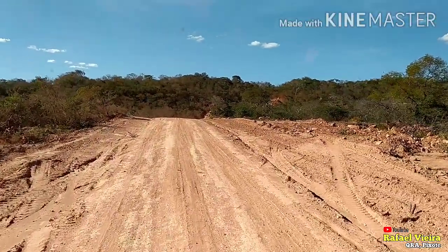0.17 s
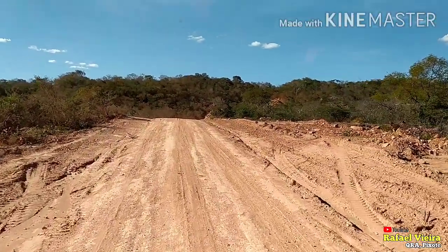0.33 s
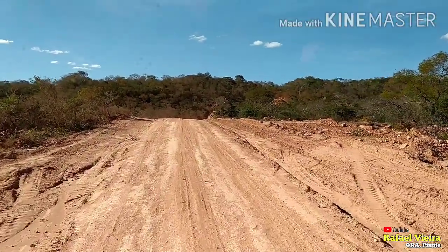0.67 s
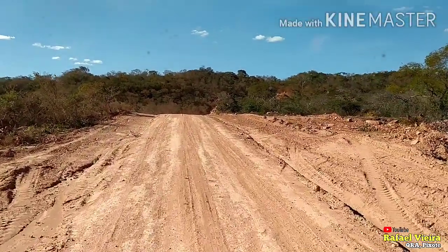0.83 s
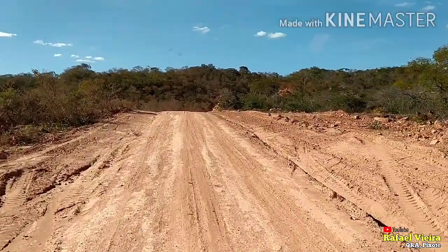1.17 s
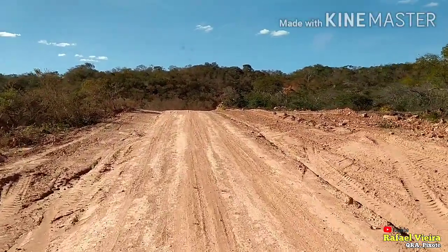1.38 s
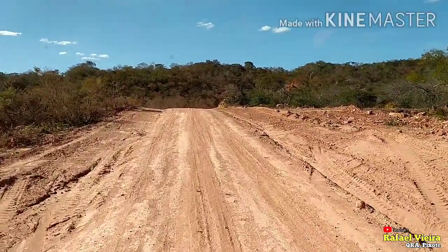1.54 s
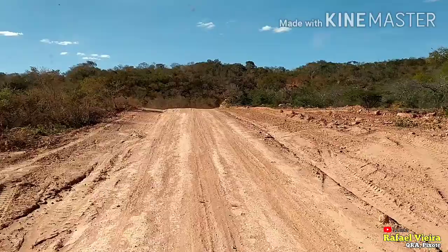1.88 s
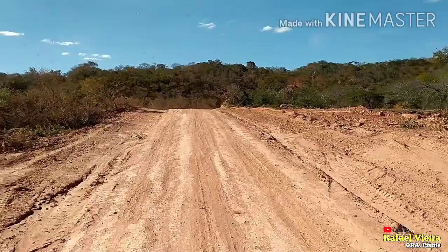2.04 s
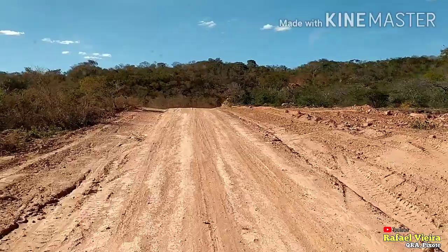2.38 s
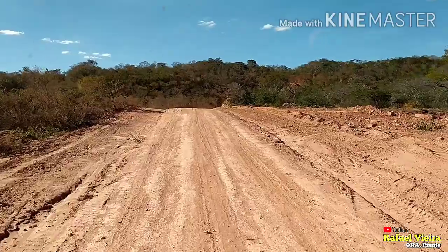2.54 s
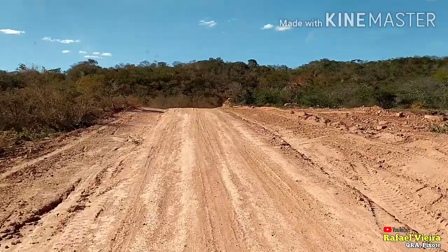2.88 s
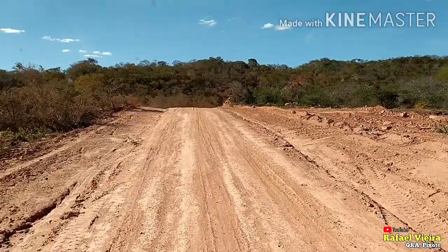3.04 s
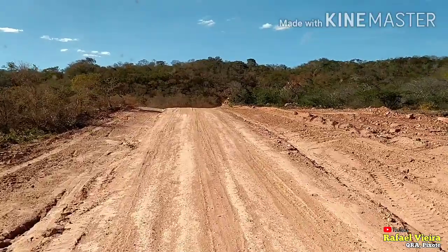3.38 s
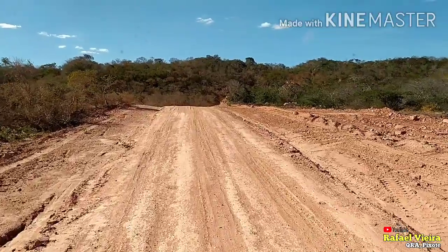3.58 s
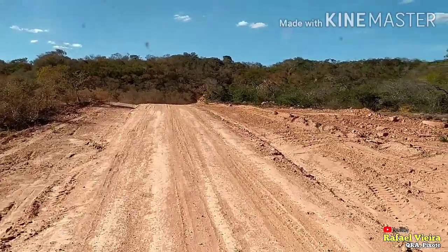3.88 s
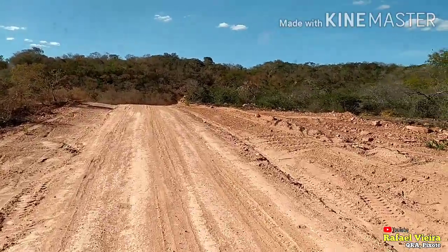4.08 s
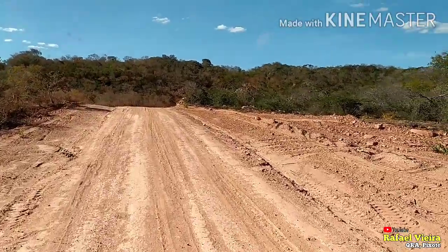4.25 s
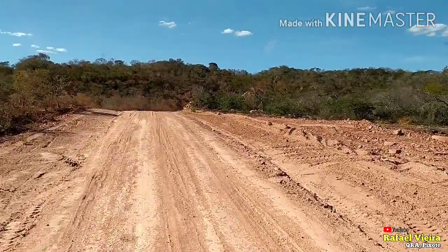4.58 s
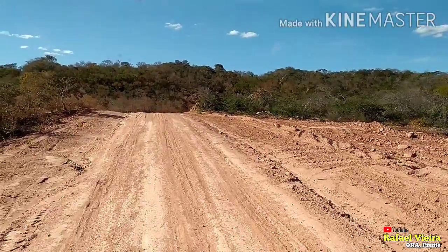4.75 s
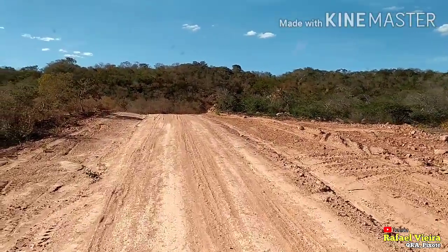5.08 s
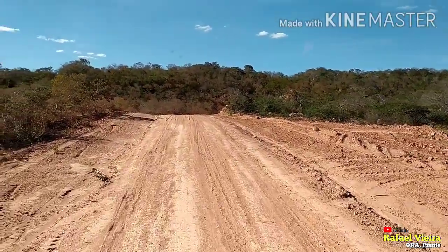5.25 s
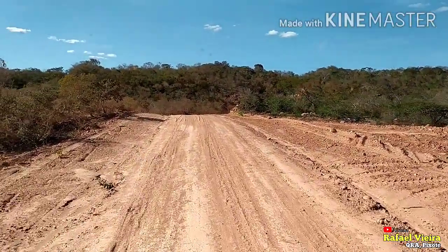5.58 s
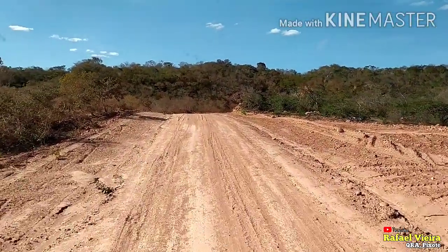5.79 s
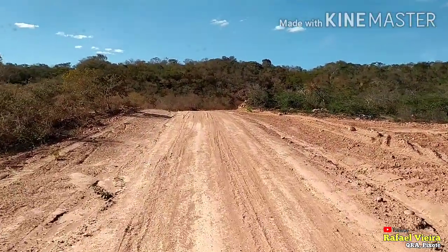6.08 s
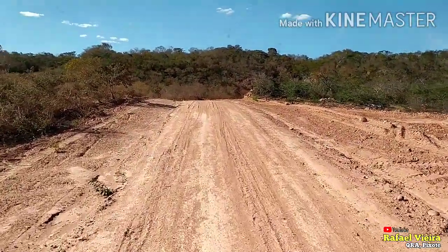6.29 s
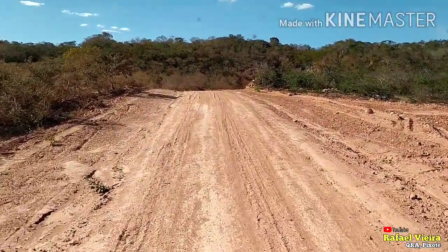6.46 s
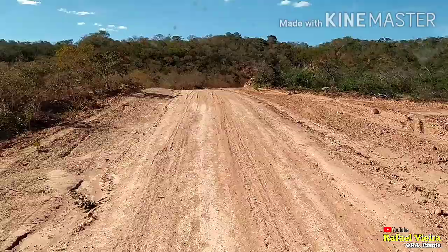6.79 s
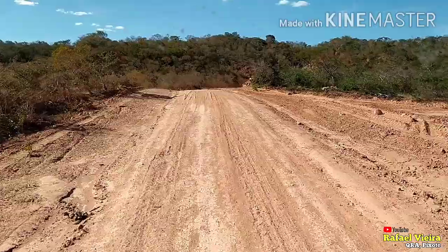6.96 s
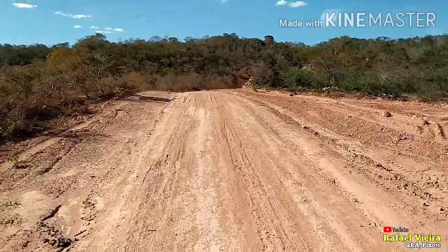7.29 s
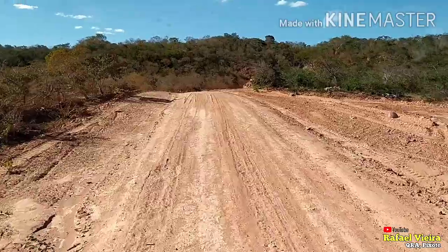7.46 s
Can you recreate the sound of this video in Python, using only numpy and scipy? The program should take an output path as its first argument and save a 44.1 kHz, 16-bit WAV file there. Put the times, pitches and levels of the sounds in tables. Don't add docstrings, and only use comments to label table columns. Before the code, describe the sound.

Inside a heavy vehicle's cab, a six-cylinder diesel pulls slowly and steadily, its low drone wavering around 58 Hz, with deep road rumble, body heaving over ruts and a faint steady pump whine near 490 Hz. From 0.25 s, close plastic trim rattles irregularly; dull knocks come at 0.6-0.8 s with a faint squeak, and the sharpest crack is at 1.65 s, another at 2.75 s. A tiny high tick repeats each second from 0.4 s. A slight air puff passes at 4.6 s. A cluster of knocks at 5.6-5.75 s leads into bright brake-air hiss, spitting at 6.2-6.4 s. Light chirps near 2.1 kHz begin at 6.03 s; from 6.64 s they become a loud, raspy, stuttering squeal on two pitches, roughest around 7.1-7.3 s, then cleaner and sinking slightly until the cut at about 7.6 s. Close stereo pickup, short dry reflections.

```python
import sys
import numpy as np
from scipy import signal
from scipy.fft import rfft, irfft, next_fast_len
from scipy.io import wavfile
from scipy.ndimage import uniform_filter1d

SR = 44100
rng = np.random.default_rng(int(sys.argv[2]) if len(sys.argv) > 2 else 0)


def output_pcm(signal):
    pcm = np.clip(np.atleast_2d(signal).T, -1, 1) * 32767
    wavfile.write(sys.argv[1], SR, np.round(pcm).astype(np.int16))


def makeup_ratio(level_db):
    decades = np.asarray(level_db, float) / 20
    return 10 ** decades


N = 336483

# time in seconds, half the firing rate in Hz, firing tone level in dB.
DRIVE = [(0.0, 30.3, -35), (0.19, 29.03, -34), (0.53, 29.98, -31), (0.7, 28.88, -35.5),
         (1.46, 27.82, -33.5), (3.53, 28.11, -30.5), (3.65, 28.95, -34), (3.87, 28.33, -31.5),
         (4.57, 28.99, -31.5), (5.06, 29.84, -35), (5.97, 29.33, -34.5), (6.06, 29.4, -39),
         (6.38, 30.0, -49), (6.78, 28.96, -51), (6.99, 29.1, -34), (7.63, 28.82, -45)]


def evened(x):
    return x / np.sqrt(np.mean(abs(x) ** 2) + 1e-20)


def read(points, hz):
    f, value = np.transpose(points)
    return np.interp(np.log(hz + 1), np.log(f + 1), value)


def curves(rows):
    s, *columns = np.transpose(rows)
    return [np.interp(np.arange(N) / SR, s, c) for c in columns]


def wander(width_hz, count=N):
    step = max(1, int(SR / width_hz) // 32)
    r = np.exp(-np.pi * width_hz * step / SR)
    few = min(count // step + 2, count // 4)
    kicks = rng.standard_normal((few, 2)) @ [1, 1j]
    z = signal.lfilter([1], np.convolve([1, -r], [1, -r]), kicks)
    return np.interp(np.arange(count) / step, np.arange(len(z)), evened(z))


def drift(turns, width_hz, count):
    return np.exp(2j * np.pi * turns * wander(width_hz, count).real)


def spin(hz, count=N):
    return np.exp(2j * np.pi * np.cumsum(hz * np.ones(count)) / SR)


def band(x, edges_hz):
    return signal.sosfilt(signal.butter(2, edges_hz, "bandpass", fs=SR, output="sos"), x)


def coloured(x, points):
    size = next_fast_len(x.shape[-1])
    gain = makeup_ratio(read(points, np.fft.rfftfreq(size, 1 / SR)))
    return irfft(rfft(x, size) * gain, size)[..., :x.shape[-1]]


def bumps(at_s, width_s):
    t = np.arange(0, N, 64) / SR
    return np.exp(-((t - np.reshape(at_s, (-1, 1))) / width_s) ** 2)


def fine(coarse):
    return np.interp(np.arange(N) / 64, np.arange(len(coarse)), coarse)


def noise(colour, level_db, patchy_db):
    # frequency in Hz, left-right correlation from -1 to 1.
    likeness = [(60, 0.62), (130, 0.99), (290, 0.71), (640, 0.82), (1410, -0.41), (3100, 0.031),
                (6820, 0.072), (15000, -0.04)]
    frames, hz = N // 512 + 5, np.fft.rfftfreq(2048, 1 / SR)[:, None]
    a, b, c, d, patches = rng.standard_normal((frames, 1025, 5)).T
    patches = evened(uniform_filter1d(uniform_filter1d(patches, size=16, axis=0), size=6, axis=1))
    same = np.clip(read(likeness, hz), -1, 1)
    left = a + 1j * b
    right = same * left + np.sqrt(1 - same ** 2) * (c + 1j * d)
    z = np.array([left, right])
    shape = makeup_ratio(read(colour, hz))
    at = np.minimum(np.arange(frames) * 512, N - 1)
    z *= shape / np.linalg.norm(shape) * makeup_ratio(level_db(hz, at) + patchy_db * patches)
    return signal.istft(z, nperseg=2048, noverlap=1536)[1][:, :N]


def cab():
    # frequency in Hz, density in dB per Hz.
    colour = [(18, -38), (30, -41.5), (59, -6.5), (82, -8.5), (103, -14.5), (161, -6), (345, -14),
              (740, -20), (2290, -31), (3310, -39.5), (6900, -44.5), (11800, -46), (12600, -53),
              (15800, -73)]
    hz, _ = curves(DRIVE)
    roar = noise(colour, lambda f, at: -37.5 + 0 * f, patchy_db=1.38)
    return roar * (1 + .12 * spin(hz).real)


def engine():
    orders_db = [-41, -79, -43, -96, -72, -62, -41, -46, -56, -38, -47.5, -44.5, -40, -47, -45.5, -41,
                 -45.5, -51.5]
    # time in seconds, heave level in dB.
    ruts = [(0.1, -49), (0.95, -40), (1.38, -33), (2.0, -36), (2.7, -47), (3.23, -27.5), (3.89, -30.5),
            (4.46, -37), (5.01, -32), (5.33, -42), (6.1, -34), (6.48, -28.5), (6.76, -32), (7.48, -23.5)]
    hz, firing_db = curves(DRIVE)
    cycle = spin(hz / 3)
    out = makeup_ratio(firing_db) * cycle ** 6 * (1 + .15 * wander(4.0))

    order = cycle ** 2 * makeup_ratio(0.1 * (firing_db - firing_db.mean()))
    for db in orders_db:
        order = order * cycle
        steady = .8 * np.exp(2j * np.pi * rng.random())
        out += makeup_ratio(db) * order * (steady + .5 * wander(10.))

    rut_s, rut_db = np.transpose(ruts)
    heave = makeup_ratio(-43.5) + fine(makeup_ratio(rut_db) @ bumps(rut_s, 0.098))
    out += heave * spin(16) * wander(11)

    whine_hz = 487.4 + 0.49 * np.arange(N) / SR
    out += makeup_ratio(-42.5) * spin(whine_hz) * (.93 + .25 * wander(14.0))
    fan_db = -59 - 11 * fine(bumps(4.3, .5)[0])
    out += makeup_ratio(fan_db) * spin(1424) * (1.07 + 0.52 * wander(6.1))
    out += makeup_ratio(-61.) * spin(2260.) * wander(90.)
    return np.sqrt(2) * out.real


def leak():
    # frequency in Hz, density in dB per Hz.
    colour = [(2500, -11), (5000, -17), (7500, -16), (9000, -8), (11000, -6.5), (12100, -22), (12600, -19),
              (15800, -29)]
    # time in seconds, level in dB.
    spits = [
        (5.743, -26),
        (6.1843, -21.5),
        (6.239, -22),
        (6.2522, -23),
        (6.3864, -21),
    ]
    since = np.arange(N) / SR - 5.74
    opened = np.clip(since / 0.058, 0, 1) * makeup_ratio(-37 - 0.5 * since)
    puff = makeup_ratio(-54.5) * fine(bumps(4.64, 0.37)[0])
    flow = makeup_ratio(-55.5) + puff + opened
    t, spit_t60_s = np.arange(3000) / SR, 0.033
    for s, db in spits:
        spit = makeup_ratio(db - 1.5 - 60 * t / spit_t60_s) * np.minimum(t / 0.0011, 1)
        flow[round(s * SR):][:3000] += spit
    return flow * makeup_ratio(-3.0) * noise(colour, lambda f, at: 0 * f, patchy_db=2.0)


def ticks():
    levels_db = [-48, -44.5, -47, -49, -50, -54]
    first_s, every_s = .3885, .9997
    out, t = np.zeros(N), np.arange(1400) / SR
    ring = evened(band(rng.standard_normal(N), (10000, 11300)))
    fade = makeup_ratio(-300 * t) * signal.windows.tukey(1400, .3)
    for k, db in enumerate(levels_db):
        at = round((first_s + k * every_s) * SR)
        out[at:at + 1400] = makeup_ratio(db) * fade * ring[at:at + 1400]
    return out


def creak():
    turn = spin(1036) * drift(.1, 30., N)
    swell = fine(bumps(.645, 0.02)[0])
    return makeup_ratio(-40.5) * swell * (turn + makeup_ratio(-10.5) * turn ** 2).real


def rattles():
    # time in seconds, crack in dB, plastic body in dB, knock in dB, body ring in Hz.
    jolts = [(0.254, -40.5, -43.5, -44, 1680), (0.5735, -45, -46, -30.5, 1310),
             (0.659, -57, -57, -32, 1270), (0.778, -59, -64, -25, 1112), (1.1781, -40, -48, -45, 1459),
             (1.6491, -28, -52, -25.5, 1377), (1.655, -22, -22.5, -42, 1255),
             (1.7361, -36.5, -51, -52, 1400), (1.7691, -28, -39, -40, 1720), (2.242, -36.5, -54, -45, 1510),
             (2.754, -26.5, -39.5, -46, 3020), (3.265, -38, -45, -48, 1190), (4.4098, -37, -43, -36, 1650),
             (4.779, -30.5, -51, -53, 1280), (5.0869, -38.5, -64, -51, 1570), (5.3135, -34, -42, -52, 1780),
             (5.5765, -40, -47, -48, 2266), (5.672, -35.5, -33, -23, 2690), (5.703, -42, -40, -31, 990),
             (5.7439, -33, -29, -49, 1420), (5.988, -62, -29.5, -43, 1777), (6.184, -42, -50, -40, 2100),
             (6.2392, -36, -52, -48, 2150), (6.386, -38, -43, -46, 2180)]
    t60_s = 0.031
    out, t = np.zeros((2, N + 6000)), np.arange(6000) / SR
    for s, crack_db, body_db, knock_db, ring_hz in jolts:
        shared, own = rng.standard_normal((4, 1, 6000)), rng.standard_normal((4, 2, 6000))
        grit = rng.exponential(1, 6000)
        clusters = (0.51 * shared + 0.96 * own) * grit
        parts = [
            ((3000, 14500), crack_db - 0.5, 1),
            ((1000, 3800), body_db + 1.0, 1.3),
            ((1.0 * ring_hz, 1.05 * ring_hz), body_db + 3.5, 1.5),
            ((300, 1050), knock_db + 3.5, 3.2)]
        for contacts, (edges_hz, db, slow) in zip(clusters, parts):
            rise = 1 - np.exp(-t / (0.0007 * slow ** 2))
            fall = makeup_ratio(db - 60 * t / (t60_s * slow))
            lower_edges_hz = (0.51 * edges_hz[0], 0.82 * edges_hz[1])
            hit = evened(band(band(contacts, edges_hz), lower_edges_hz))
            out[:, round(s * SR):][:, :6000] += fall * rise * hit
    return out[:, :N]


def holds(t, start, length, t60, grab_s):
    since = t - start[:, None]
    release = np.maximum(since - length[:, None], 0)
    return np.clip(since / grab_s, 0, 1) * makeup_ratio(-60 * release / t60)


def summed(levels_db, shapes):
    return 10 * np.log10(makeup_ratio(levels_db) ** 2 @ shapes ** 2 + makeup_ratio(-55) ** 2)


def seat(n):
    # start in seconds, length in seconds, level in dB, pitch in Hz.
    touches = [(6.033, .022, -35.5, 2180), (6.055, 0.031, -27, 2160), (6.083, 0.023, -24, 2144),
               (6.112, 0.015, -28.5, 2221), (6.166, 0.028, -32.5, 2245), (6.19, 0.031, -22, 2103),
               (6.244, 0.01, -28.5, 2060), (6.267, 0.019, -36.5, 2142), (6.361, 0.032, -39.5, 2170),
               (6.399, .04, -33, 2118), (6.537, 0.019, -42, 2108), (6.573, .025, -32, 2077),
               (6.609, 0.019, -32.5, 2154)]
    # start in seconds, length in seconds, upper mode in dB, lower mode in dB,
    # overtones in dB.
    slips = [(6.638, 0.03, -25.5, -44, -32.5), (6.662, 0.046, -27, -37, -21.5),
             (6.727, 0.032, -25, -29, -24), (6.794, 0.033, -30, -36, -36), (6.818, .064, -24, -29, -20),
             (6.914, .01, -28, -24, -34), (6.94, 0.058, -25, -23.5, -18.5), (6.996, .055, -23.5, -21, -19),
             (7.075, 0.08, -25, -20.5, -19.5), (7.164, 0.055, -30, -21, -21),
             (7.212, 0.06, -26.5, -21, -21), (7.274, 0.097, -27.5, -22, -19), (7.338, 0.024, -23, -20, -25),
             (7.364, 0.042, -23.5, -16.5, -19.5), (7.406, 0.0494, -20.5, -32, -22.5),
             (7.476, 0.0612, -22.5, -40.5, -25), (7.544, 0.042, -21, -32.5, -19.5),
             (7.588, 0.034, -21, -33, -17)]
    # time in seconds, upper mode in Hz, jitter from 0 to 1.
    under_load = [
        (6.6, 2046, 0.68),
        (6.8, 1992, 0.64),
        (6.86, 1935, .6),
        (7.1, 1929, 0.76),
        (7.3, 1881, 0.72),
        (7.4, 1964, 0.42),
        (7.5, 1996, 0.25),
        (7.57, 1875, 0.41),
        (7.63, 1820, 0.07),
    ]
    touch_s, grab_s, slack_hz, chirp_jitter = .012, .008, 69.8, .17
    t = np.arange(N - n, N) / SR

    start, length, chirp_db, chirp_hz = np.transpose(touches)
    chirps = makeup_ratio(chirp_db)[:, None] * holds(t, start, length, .06, touch_s)
    beat = np.cos(2 * np.pi * 62 * (t - start[:, None] - touch_s))
    chirps = chirps * (1 + .16 * beat)

    start, length, upper_db, lower_db, overtones_db = np.transpose(slips)
    modes = holds(t, start, length, .09, grab_s)
    contact = holds(t, start, length, 0.061, grab_s)
    loaded_hz, loaded_jitter = (c[-n:] for c in curves(under_load))
    slack = 1 - uniform_filter1d(contact.max(0), size=600)
    loaded_hz = loaded_hz + slack_hz * loaded_jitter * slack

    light = (chirps ** 2).sum(0) + 1e-12
    heavy = makeup_ratio(upper_db) ** 2 @ modes ** 2
    light_hz = (chirp_hz @ chirps ** 2 + 1e-12 * chirp_hz[0]) / light
    load = heavy / (light + heavy)
    return (10 * np.log10(light + heavy),
            light_hz + load * (loaded_hz - light_hz),
            summed(lower_db, contact) - 13 * (1 - load),
            summed(overtones_db, contact),
            chirp_jitter + load * (loaded_jitter - chirp_jitter))


def squeal():
    # frequency in Hz, width in Hz, level in dB.
    lower_modes = [(1656, 33, -1), (1714, 46, -9.5), (1475, 210, -15)]
    # multiple of the joint phase, level in dB.
    overtones = [(2, -10.5), (3, -10.5), (4, -4.5), (5, -3.5), (6, -3), (7, -10), (8, -15)]
    # frequency in Hz, gain in dB.
    valve_body = [(1200, -8), (2300, -1.5), (2800, -6.5), (3300, -2), (4250, 0), (4600, -3), (5000, -1.5),
                  (6200, -7), (6800, -6.5), (9300, 0), (12100, -9.5), (12500, -13), (13500, 2), (15500, -7)]
    n = N - round(6 * SR)
    upper_db, hz, lower_db, overtones_db, jitter = seat(n)
    jitter = np.clip(jitter, 0, 1)

    turn = spin(hz * (1 + 0.024 * jitter * wander(300., n).real), n)
    lower = np.zeros(n, complex)
    for f, width, db in lower_modes:
        sway = 0.45 * drift(0.19, width, n) + 0.65 * wander(2.6 * width, n)
        lower += makeup_ratio(db) * spin(f, n) * sway
    lower = evened(lower)
    phase = makeup_ratio(upper_db) * turn + 0.76 * makeup_ratio(lower_db) * lower
    phase /= abs(phase)

    unsteady = jitter * (0.8 * wander(85.0, n) + 0.6 * jitter * wander(320.0, n))
    upper = turn * (np.sqrt(1 - 0.6 * jitter ** 2) + unsteady)
    octave_db = np.minimum(0.6 * (upper_db + 21) - (hz - 2100) / 15., 0) - 12.
    upper += makeup_ratio(octave_db) * turn ** 2 * (0.9 + 0.25 * wander(60., n))

    out = np.zeros((2, N))
    for port in out:
        modes = makeup_ratio(upper_db) * upper * drift(0.047 + 0.079 * jitter, 23.0, n)
        modes += makeup_ratio(lower_db) * lower * drift(0.18, 16.0, n)
        contact = np.zeros(n)
        for k, db in overtones:
            waver = 0.7 - 0.28 * jitter + (0.55 + 0.29 * jitter) * wander(170.0, n)
            contact += makeup_ratio(db) * (phase ** k * waver).real
        rasp = 0.79 * jitter ** 2 * rng.standard_normal(n)
        buzz = makeup_ratio(overtones_db) * coloured(contact + rasp, valve_body)
        port[-n:] = np.sqrt(2) * (modes.real + buzz)
    return out


def cabin(x, lag, wet_db, t60):
    # frequency in Hz, gain in dB.
    top_loss = [(11800, 3), (12600, -17), (15000, -8.5)]
    t = np.arange(3000) / SR
    taps = rng.choice([-1., 1.], (2, 3000)) * (rng.random((2, 3000)) < .06)
    taps *= makeup_ratio(-60 * t / t60) * (t > .0008)
    taps *= makeup_ratio(wet_db) / np.linalg.norm(taps, axis=1, keepdims=True)
    taps[0, lag] += 1
    taps[1, 0] += 1
    return coloured(signal.fftconvolve(np.atleast_2d(x), taps, axes=1)[:, :N], top_loss)


def scene():
    far = engine() + makeup_ratio(4.0) * (cab() + leak())
    near = cabin(rattles() + ticks() + creak(), 20, wet_db=-6.5, t60=0.1)
    valve = makeup_ratio([[-.6], [-.7]]) * cabin(squeal(), 14, wet_db=-8.0, t60=0.05)
    return far + near + valve


def band_limit(x):
    return signal.sosfilt(signal.butter(12, 16260, fs=SR, output="sos"), x)


def record(dry):
    # frequency in Hz, left over right in dB.
    tilt = [(60, 0), (150, -1.5), (380, 0), (950, 1), (2380, 7.5), (5980, -0.5), (15000, 8)]
    # frequency in Hz, margin to the neighbouring bands in dB under which a
    gate = [(2900, -30), (3200, -3), (4500, -1.4), (8000, -1.4), (8500, -7), (12200, -7), (12500, 1.2)]
    left = coloured(dry[0], [(f, db / 2) for f, db in tilt])
    right = coloured(dry[1], [(f, -db / 2) for f, db in tilt])
    hz, _, z = signal.stft([left, right], SR, nperseg=1024, noverlap=512)
    power = uniform_filter1d((abs(z) ** 2).sum(0), size=3, axis=1)
    narrow_db = 10 * np.log10(uniform_filter1d(power, size=4, axis=0) + 1e-20)
    margin_db = narrow_db - uniform_filter1d(narrow_db, size=40, axis=0)
    weak = margin_db < read(gate, hz)[:, None]
    z *= np.where(weak, .02, 1) * (hz[:, None] < 15850)
    thinned = signal.istft(z, SR, nperseg=1024, noverlap=512)[1][:, :N]
    limited = thinned / (1 + (1.15 * thinned) ** 6) ** (1 / 6)
    return band_limit(limited)


dry = scene()
out = record(dry)
output_pcm(out)
```